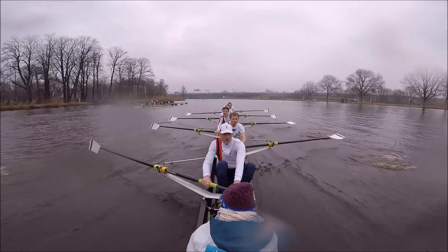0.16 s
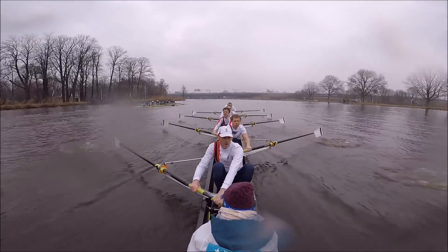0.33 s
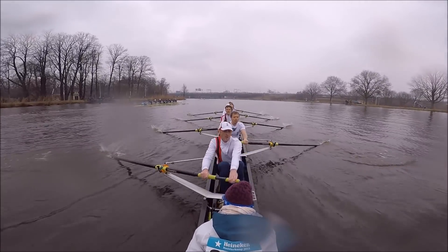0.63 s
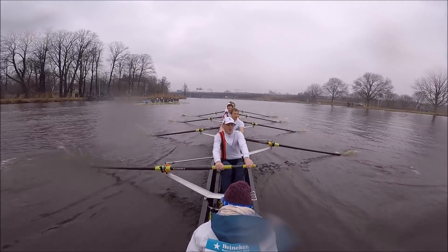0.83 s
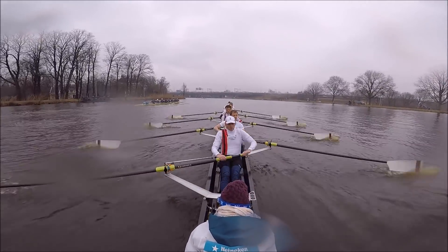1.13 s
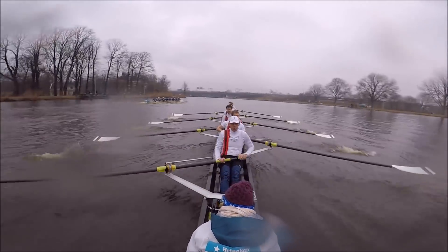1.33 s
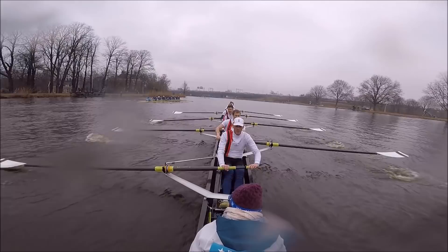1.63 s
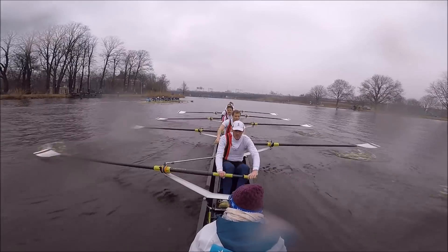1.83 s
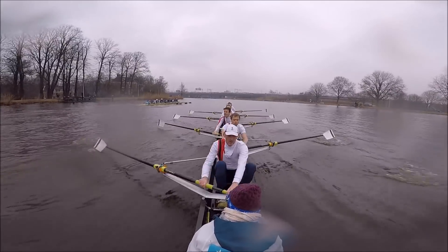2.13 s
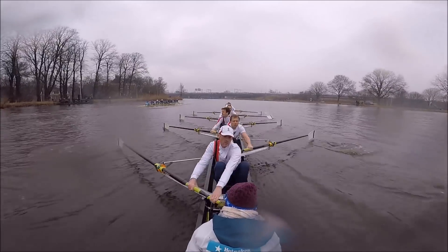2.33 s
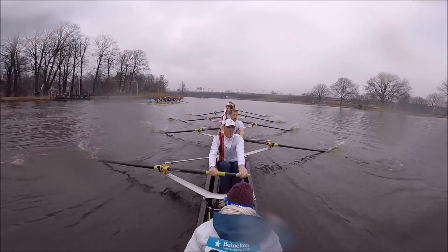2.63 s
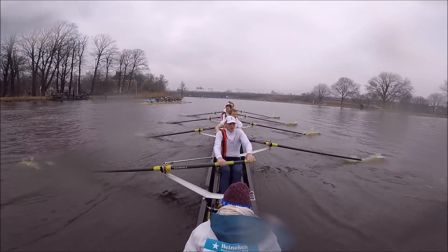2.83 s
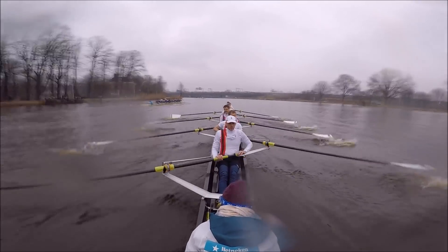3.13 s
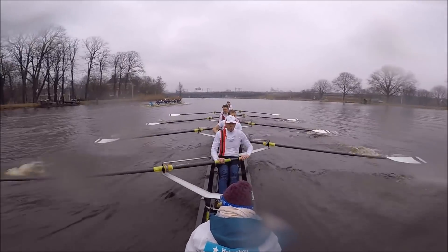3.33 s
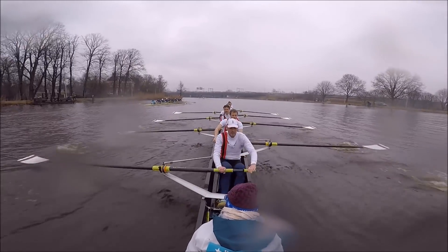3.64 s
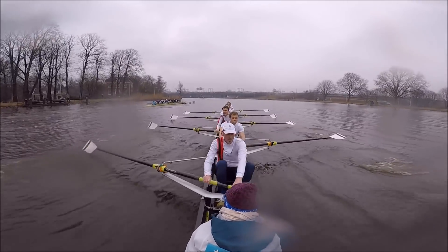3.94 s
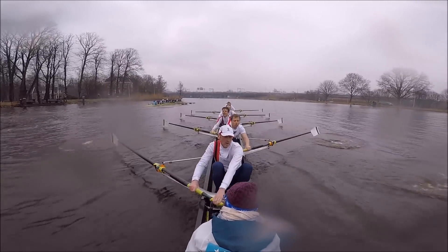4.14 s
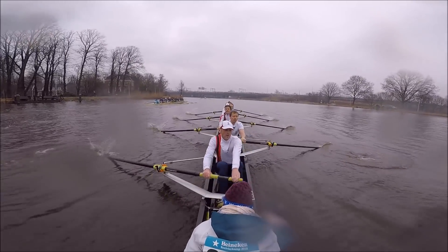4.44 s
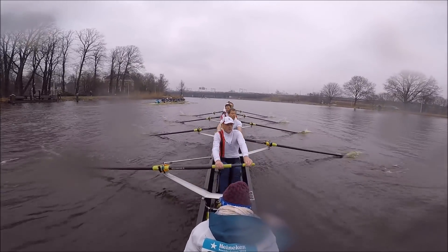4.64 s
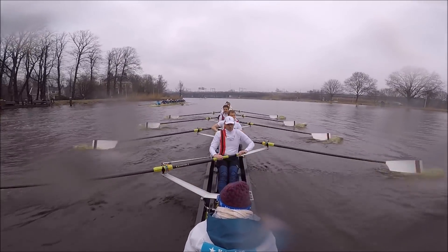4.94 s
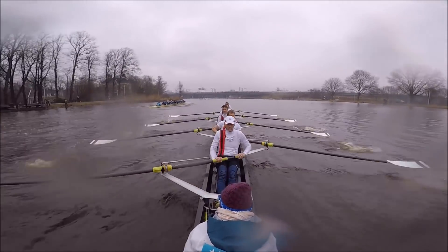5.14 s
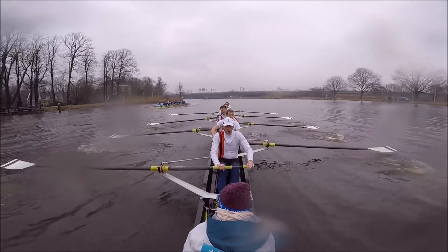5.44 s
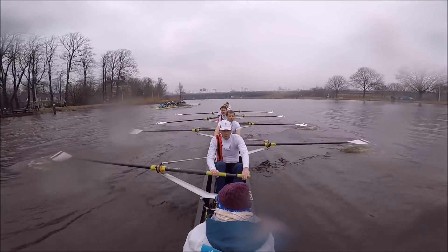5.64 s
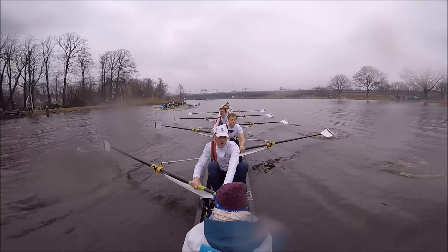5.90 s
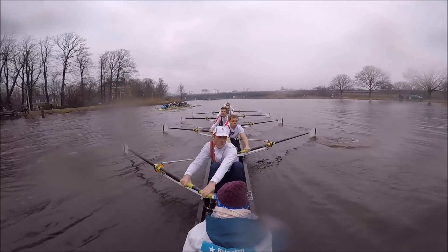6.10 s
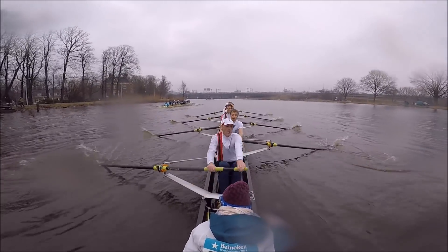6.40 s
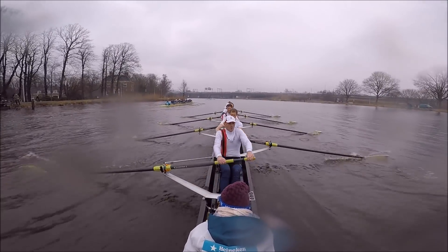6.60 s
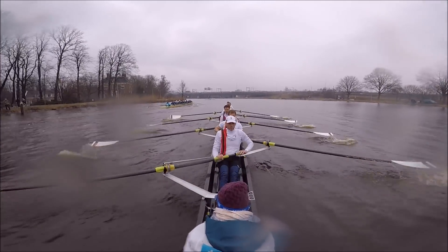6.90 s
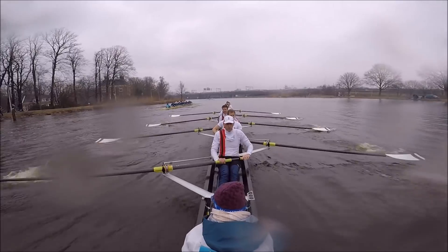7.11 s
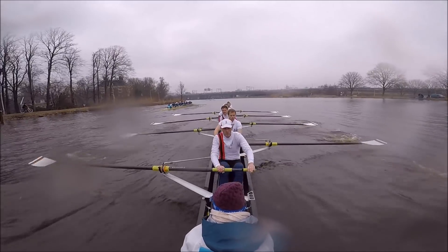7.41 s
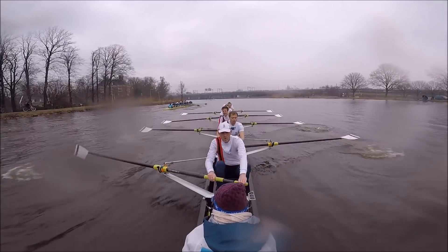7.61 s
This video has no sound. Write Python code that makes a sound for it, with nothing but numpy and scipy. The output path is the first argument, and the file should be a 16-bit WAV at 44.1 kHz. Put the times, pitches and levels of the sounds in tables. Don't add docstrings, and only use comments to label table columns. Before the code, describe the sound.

From a small sealed camera fixed to the stern of a rowing eight, the sound is close, muffled and dominated by low hull boom and a deep wind hum. Catches at about 0.5, 2.4, 4.3 and 6.2 seconds bring tight clusters of hollow thuds, drops ticking on the housing and brief crackling splashes just afterwards; the last is hardest. Finishes at about 1.4, 3.3, 5.1 and 7.0 seconds swell into a rumbling rush with duller thuds, bright wooden knocks and rattling gates. Low shudders and short keel drones accompany the load. Between strokes the rush sinks to a softer glide, with a rounded bubble plop near 1.6 seconds. Thin spray and air hiss persist above. The post swings with low throbs, longest around 7.0 seconds, before the closing glide and the build toward another stroke.

```python
import sys
import numpy as np
from scipy import signal
from scipy.fft import rfft, irfft
from scipy.io import wavfile
from scipy.ndimage import uniform_filter1d

SR = 44100
rng = np.random.default_rng(int(sys.argv[2]) if len(sys.argv) > 2 else 0)


def how_loud(loudness_db):
    steps = np.asarray(loudness_db, float) / 20
    return 10 ** steps


def dump_mix(stems):
    frames = np.atleast_2d(stems).T
    limited = np.clip(frames, -1, 1)
    pcm = np.round(limited * 32767).astype(np.int16)
    wavfile.write(sys.argv[1], SR, pcm)


N = 342216

# (catch time [s], catch force [dB], finish time [s], finish force [dB], wash in the glide [dB])
STROKES = [
    (-1.35, 0, -0.47, 0, -2),
    (0.55, -1, 1.41, 0, -1),
    (2.43, 0, 3.32, 0.5, 0),
    (4.33, 0, 5.17, 0, 2),
    (6.18, 1.5, 7.06, 0, 1),
    (8.08, 0, 8.95, 0, 0),
]
# (roll-up [dB], catch [dB], late drive [dB], finish [dB], feather [dB], glide [dB])
BOOM_DB = (-28, -25, -27, -26, -26, -32)
KEEL_DB = (-33.5, -27, -34, -25.5, -29, -43.5)
RUMBLE_DB = (-35, -27, -34, -22.5, -29, -44)
RUSH_DB = (-44.5, -41.5, -45.5, -39, -47, -49)
SPRAY_DB = (-56, -52.5, -55.5, -45, -52, -56)
# (roll-up before catch [s], load before catch [s], late drive before finish [s],
# peak before finish [s], feather after finish [s], glide after finish [s])
BOOM_S = (.4, .03, .2, .03, .17, .38)
KEEL_S = (.42, .02, .17, .03, .11, .3)
RUMBLE_S = (.42, .01, .18, .05, .11, .28)
RUSH_S = (.36, .05, .45, .05, .08, .3)
SPRAY_S = (.36, .12, .55, .12, .06, .4)

# (frequency [Hz], width [Hz], level [dB], left minus right [dB], left lead [rad])
HULL_MODES = [(110.47, 9.8, -6.5, -2.5, -0.9), (129.2, 12, -14.5, 5.5, -1.14),
              (189.5, 9.8, -17, -4.5, -0.83), (208.9, 17.6, -17.5, -2, -1.45), (274, 24, -26, -1.5, 4),
              (319.7, 18.6, -22, -2, -1.5), (345.3, 16.3, -26, 1, -3), (384.3, 23.5, -25.5, 3.5, -0.5),
              (431.7, 34, -25.5, 4.5, 1.5), (464, 26.3, -23.5, 2.5, 2), (520, 69, -39.5, 0.5, 2.5),
              (623, 60, -25, 0, 2.5), (680, 93, -34.5, -4, 4), (824, 46, -30.5, -2.5, 3.5),
              (900, 47.5, -31, -6.5, 3)]
# (frequency [Hz], width [Hz], level [dB], left minus right [dB], left lead [rad])
DECK_MODES = [(1067, 175, -39.5, -4.6, 2.7), (1245, 215, -39, -2.5, 2.26), (1485, 228, -40.5, 4.5, 1.77),
              (1660, 150, -43, -6.5, 1.6), (1932, 240, -43, 0.5, 2)]
# (frequency [Hz], width [Hz], level [dB], left minus right [dB], left lead [rad])
LOCK_MODES = [(784, 350, -43, -2, 2.54), (2700, 1200, -61, 1.5, .2)]
# (frequency [Hz], width [Hz], level [dB], left minus right [dB], left lead [rad])
POST_MODES = [(37.5, 3.5, -1.5, 0.8, -0.62), (56.6, 12.3, -7.5, -5, -0.53), (79.1, 16.7, -12, -0.5, -.4)]

# (time [s], peak level [dB])
CATCH_THUDS = [(0.385, -13), (0.423, -23), (0.53, -6.5), (0.558, -13), (0.706, -25), (2.265, -25),
               (2.425, -7), (2.455, -6), (4.232, -10.5), (4.321, -3), (4.346, -15), (4.372, -12),
               (4.487, -10), (6.021, -10), (6.058, -21), (6.176, -7), (6.194, -6.5), (6.369, -10.5)]
# (time [s], peak level [dB])
FINISH_THUDS = [(1.316, -8.5), (1.34, -7), (1.368, -8), (1.389, -12), (1.495, -24), (3.137, -19.5),
                (3.17, -13), (3.222, -11.5), (3.272, -3.5), (3.371, -18), (5.03, -8), (5.108, -7),
                (5.142, -7), (5.219, -19), (6.901, -14.5), (6.953, -8), (6.977, -6), (6.996, -7),
                (7.033, -6), (7.131, -10.5), (7.172, -13)]
# (time [s], peak level [dB])
KNOCKS = [(0.064, -30), (0.417, -29.5), (0.736, -24.5), (1.112, -28.5), (1.374, -19), (1.4095, -8.5),
          (1.872, -33.5), (2.597, -30.5), (2.62, -23.5), (2.6793, -24), (3.307, -7), (4.226, -35),
          (4.3223, -25), (4.5106, -42), (5.0808, -24.5), (5.1544, -16.5), (5.17, -10), (6.176, -31),
          (6.327, -29), (6.5161, -30), (7.0306, -17), (7.061, -9.5), (7.159, -27), (7.5862, -33)]
# (time [s], length [s], level [dB])
SHUDDERS = [(0.25, .32, -15), (0.63, .27, -21.5), (1.27, .3, -14.5), (2.08, .3, -23), (2.39, .16, -15),
            (2.62, .18, -17.5), (3.12, .12, -19), (3.31, .27, -14.5), (3.98, .2, -21), (4.22, .24, -16.5),
            (4.62, .2, -21), (5.04, .22, -21), (5.99, .26, -13.5), (6.25, .25, -18), (6.9, .22, -16),
            (7.12, .13, -19)]
# (time [s], length [s], level [dB])
DRONES = [
    (0.48, .14, -28),
    (1.32, .2, -24),
    (2.36, .2, -27),
    (3.22, .25, -26),
    (4.3, .2, -23),
    (5.02, .12, -24),
    (5.17, .2, -20),
    (6.2, .26, -23),
    (6.98, .24, -24),
]
# (time [s], peak level [dB], top edge level [dB])
GATE_TICKS = [(1.0964, -27.5, -23), (1.3324, -33, -28), (1.3708, -23, -29), (1.388, -25.5, -36),
              (1.4148, -21, -33), (1.428, -31.5, -21), (1.493, -29, -27), (2.994, -29.5, -31),
              (3.267, -27, -31), (3.2703, -22, -29), (3.2862, -23.5, -38), (3.3114, -18.5, -32),
              (3.3393, -38, -30), (3.616, -35.5, -29), (4.874, -32, -22), (5.136, -23, -22.5),
              (5.165, -18.5, -33), (5.1764, -24.5, -32), (5.258, -34, -27), (5.4065, -31, -22),
              (6.83, -31, -25), (6.9785, -31, -25), (6.9936, -31, -24), (7.027, -22.5, -24),
              (7.038, -22, -23), (7.0665, -19.5, -30), (7.156, -36, -25)]
# (time [s], peak level [dB], top edge level [dB])
DROP_TICKS = [(0.3875, -32.5, -28), (0.5443, -34, -32), (0.648, -30.5, -29), (0.6772, -34, -21),
              (0.7148, -25, -35), (0.7352, -21, -33), (0.7435, -21, -39), (0.7887, -29, -16.5),
              (1.8628, -31.5, -31), (2.2944, -22.5, -22.5), (2.36, -33.5, -27), (2.4174, -33.5, -24),
              (2.597, -24, -25), (2.68, -16.5, -28), (2.7756, -30.5, -25), (4.2313, -25.5, -37),
              (4.3782, -32, -30), (4.428, -33, -23), (4.483, -28.5, -33), (4.5072, -28.5, -30),
              (4.533, -23, -35), (6.0257, -28, -31), (6.216, -30.5, -27), (6.2926, -24.5, -23),
              (6.3098, -27, -19), (6.3385, -38, -22), (6.3985, -23.5, -15.5)]
# (time [s], length [s], level [dB])
SPLASHES = [(0.732, 0.07, -38.5), (1.327, .1, -45.5), (2.543, .02, -48), (2.607, 0.12, -44.5),
            (3.242, 0.039, -42.5), (4.216, 0.031, -49), (4.485, 0.1, -44), (5.084, 0.13, -50),
            (5.407, 0.016, -43), (6.378, 0.074, -40), (6.965, 0.17, -51)]
# (time [s], peak level [dB], frequency [Hz])
PLOPS = [
    (0.417, -33, 1526),
    (1.6, -30, 635),
    (2.36, -34, 1125),
    (4.658, -31, 924),
    (5.551, -40, 900),
    (6.515, -40, 1540),
]
# (time [s], length [s], level [dB])
SWINGS = [
    (0.48, .15, -22),
    (0.9, .2, -18),
    (1.53, .22, -17),
    (2.47, .3, -19),
    (3.15, .15, -14.5),
    (3.45, .16, -19),
    (5.05, .35, -16),
    (6.96, .48, -13.5),
]
# (time [s], level [dB])
GUSTS = [(0.0, -17), (0.15, -26), (0.6, -20), (1.2, -22), (1.65, -20), (2.0, -24), (2.45, -20.5),
         (3.07, -27), (3.3, -18), (3.6, -21), (3.95, -28), (4.4, -21), (5.0, -18.5), (5.6, -22), (6.2, -19),
         (6.8, -21), (7.2, -20), (7.62, -25)]
# (frequency [Hz], density [dB per Hz])
SPRAY_COLOUR = [(1200, 1), (2100, 3), (2800, -2), (4500, -4), (6200, -4), (7500, -10), (10000, -16.5),
                (12000, -24), (14500, -38)]
# (frequency [Hz], left minus right [dB], likeness [-1 to 1])
PORTS = [(2000, -5.5, 0.67), (3000, 1.5, 0.45), (4200, -8.5, .75), (5500, 4, .3), (7000, -2, -.3),
         (8500, -8, -.35), (12000, -9, -.1)]


def unit(x):
    return x / np.sqrt(np.mean(x ** 2))


def walk(rate):
    hold = int(SR / rate)
    steps = np.repeat(rng.standard_normal(N // hold + 1), hold)
    return 1.37 * uniform_filter1d(steps, hold)[:N]


def stroke(levels_db, times_s):
    catch, catch_db, finish, finish_db, wash_db = np.transpose(STROKES)
    roll, load, late, peak, feather, glide = np.abs(times_s)
    s = np.array([catch - roll, catch - load, finish - late,
                  finish - peak, finish + feather, finish + glide]).T.ravel()
    force_db = np.array([catch_db, catch_db, 0 * catch, finish_db, finish_db, wash_db]).T
    return how_loud(np.interp(np.arange(N) / SR, np.sort(s), (force_db + levels_db).ravel()))


def grit(rate, scatter_db, share):
    share, hits = np.clip(share, 0, 1), np.zeros(N)
    when, size, sign = rng.random((3, N // 32))[:, :int(rate * N / SR)]
    hits[(when * N).astype(int)] = how_loud(-scatter_db * np.log(size)) * (sign - .5)
    return np.sqrt(1 - share) * rng.standard_normal(N) + np.sqrt(share) * unit(hits)


def bursts(rows):
    out, t = np.zeros(N), np.arange(2048) / SR
    s, gain, length = np.transpose(rows)[:, :, None]
    shape = gain * (t / length) ** 0.65 * np.exp(-1.2 * t / length)
    grains = rng.standard_normal((len(rows), len(t))) * shape
    for i, grain in zip((s[:, 0] * SR).astype(int), grains):
        out[i:i + len(t)] += grain[:N - i]
    return out


def mode(force, hz, width, db, lean_db, lead, skirt=4.34):
    r = np.exp(-np.pi * width * np.array([1, skirt]) / SR)
    poles = r * np.exp(2j * np.pi * hz / SR)
    ring = signal.lfilter([np.prod(1 - r)], np.poly(poles), force + 1e-18)
    side = np.array([[.5], [-.5]])
    return (ring * (how_loud(db + lean_db * side) * np.exp(1j * lead * side))).real


def driven(modes, like, rate, share, flicker_db, surge_db):
    like, out, own = np.clip(like, 0, 1), 0, rng.standard_normal((2, N))
    for row in modes:
        force = np.sqrt(like) * grit(rate, 2.86, share) + np.sqrt(1 - like) * own
        out = out + mode(force * how_loud(flicker_db * walk(11) + surge_db), *row)
    return unit(out)


def struck(modes, events, spread_db, ref_hz):
    chance, out = rng.standard_normal((len(events), len(modes))), 0
    for row, luck in zip(modes, chance.T):
        octaves = np.log2(row[0] / ref_hz)
        pushes = [(s, how_loud(db + tilt_db * octaves + spread_db * c), length)
                  for (s, db, tilt_db, length), c in zip(events, luck)]
        out = out + mode(bursts(pushes), *row)
    return out


def sustained(rows, row):
    t = np.arange(N) / SR
    swell_s, waver = .05, .03
    push = sum(how_loud(db) * np.clip(np.minimum(t - s, s + d - t) / swell_s, 0, 1) for s, d, db in rows)
    turns = np.cumsum(row[0] * (1 + waver * walk(9))) / SR
    return mode(push * np.sin(2 * np.pi * turns), *row)


def oarlocks():
    blows = [(s, db, 2.5, .0066) for s, db in CATCH_THUDS]
    blows += [(s, db, -4, .0063) for s, db in FINISH_THUDS]
    thuds = how_loud(49.0) * struck(HULL_MODES[2:], blows, spread_db=1.5, ref_hz=376)
    hard = [(s, db, 0, .0045) for s, db in KNOCKS]
    knocks = how_loud(62.5) * struck(list(DECK_MODES) + list(LOCK_MODES), hard, spread_db=0.8, ref_hz=1500)
    return thuds + knocks


def hull_and_deck():
    surge = walk(30)
    boom = driven(HULL_MODES[:2], like=.8, rate=34, share=0.11, flicker_db=0.6, surge_db=0)
    keel = driven(HULL_MODES[2:4], like=0.61, rate=52, share=0.14, flicker_db=0.5, surge_db=0.83 * surge)
    rumble = driven(HULL_MODES[4:], like=0.84, rate=120, share=.35, flicker_db=1.55, surge_db=1.77 * surge)
    rush = driven(DECK_MODES, like=0.75, rate=300, share=0.14, flicker_db=1.2, surge_db=1.33 * surge)
    low = stroke(BOOM_DB, BOOM_S) * boom + stroke(KEEL_DB, KEEL_S) * keel
    return low + stroke(RUMBLE_DB, RUMBLE_S) * rumble + stroke(RUSH_DB, RUSH_S) * how_loud(4.5) * rush


def loaded_shell():
    shudder = how_loud(15) * sustained(SHUDDERS, HULL_MODES[0]) + how_loud(17) * sustained(SHUDDERS, HULL_MODES[1])
    return shudder + how_loud(25) * sustained(DRONES, HULL_MODES[2])


def ticks(rows, ring_hz):
    out, t = np.zeros((3, N)), np.arange(1024) / SR
    noise = rng.standard_normal((len(rows), 3, len(t)))
    dull = signal.sosfilt(signal.butter(3, [2500, 7500], "bandpass", fs=SR, output="sos"), noise)
    top = signal.sosfilt(signal.butter(3, 7500, "highpass", fs=SR, output="sos"), noise)
    shape = t / 0.0028 * np.exp(1 - t / 0.0011)
    for (s, db, top_db), body, edge, luck in zip(rows, dull, top, noise[:, 0, -1]):
        i = int(s * SR)
        ring = np.sin(2 * np.pi * ring_hz * np.exp(.08 * luck) * t)
        crack = 1.75 * body + how_loud(top_db + 24) * edge + 0.35 * ring
        out[:, i:i + len(t)] += how_loud(db - 4.0) * shape * crack
    return out


def droplets(count=4000):
    when, pitch, size = rng.random((count, 3)).T[:, :, None]
    t, out = np.arange(160) / SR, np.zeros(N + 160)
    hz = 2400 * 4.5 ** pitch
    turns = hz * t / 3.78
    grain = how_loud(-1.9 * np.log(size)) * turns * np.exp(-turns) * np.sin(2 * np.pi * hz * t)
    np.add.at(out, (when * N).astype(int) + np.arange(len(t)), grain)
    return unit(out[:N])


def spray():
    t = np.arange(N) / SR
    sheet = sum(how_loud(db) * np.clip(np.minimum((t - s) / 0.0035, (s + d - t) / (0.89 * d)), 0, 1)
                for s, d, db in SPLASHES)
    hiss = np.array([grit(600, 2.6, .12) + 0.35 * droplets() for _ in range(3)])
    return hiss * (stroke(SPRAY_DB, SPRAY_S) * how_loud(1.0) + sheet) * how_loud(1.0 * walk(40))


def plops():
    out, t = np.zeros(N), np.arange(2048) / SR
    for s, db, hz in PLOPS:
        i = int(s * SR)
        tone = np.sin(2 * np.pi * hz * t * (1 + 1.5 * t))
        out[i:i + len(t)] += how_loud(db) * t / 0.004 * np.exp(1 - t / 0.0037) * tone
    return out * np.array([[.3], [1.6]])


def post():
    sway = how_loud(np.interp(np.arange(N) / SR, *np.transpose(GUSTS)))
    hum = sway * driven(POST_MODES, like=.985, rate=30, share=0.18, flicker_db=0.6, surge_db=0)
    return hum + how_loud(10) * sustained(SWINGS, POST_MODES[0])


def airstream():
    high = signal.butter(2, 6000, "highpass", fs=SR, output="sos")
    air = signal.sosfilt(high, rng.standard_normal((3, N)))
    return how_loud(-59.5) * how_loud(1.5 * walk(6)) * air


def ports(shared, own):
    hz = np.log(np.fft.rfftfreq(N, 1 / SR) + 1)
    f, lean_db, like = np.transpose(PORTS)
    lean_db = np.interp(hz, np.log(f), lean_db)
    like = np.clip(np.interp(hz, np.log(f), like), -1, 1)
    colour_hz, colour_db = np.transpose(SPRAY_COLOUR)
    colour = unit(how_loud(np.interp(hz, np.log(colour_hz), colour_db, left=-90)))
    common = np.sqrt(abs(like)) * rfft(shared) * np.array([np.ones_like(like), np.sign(like)])
    apart = np.sqrt(1 - abs(like)) * rfft(own)
    return irfft((common + apart) * colour * how_loud(np.array([lean_db, -lean_db]) / 2), N)


def scene():
    treble = ticks(GATE_TICKS, 4500) + ticks(DROP_TICKS, 4300) + spray() + airstream()
    mount = oarlocks() + hull_and_deck() + loaded_shell() + plops() + post()
    return mount + ports(treble[0], treble[1:])


def top_cut(x):
    return signal.sosfilt(signal.butter(12, 14500, fs=SR, output="sos"), x)


def record(dry):
    mix = np.tanh(1.258 * dry) / 0.88
    return top_cut(mix)


dry = scene()
out = record(dry)
dump_mix(out)
```